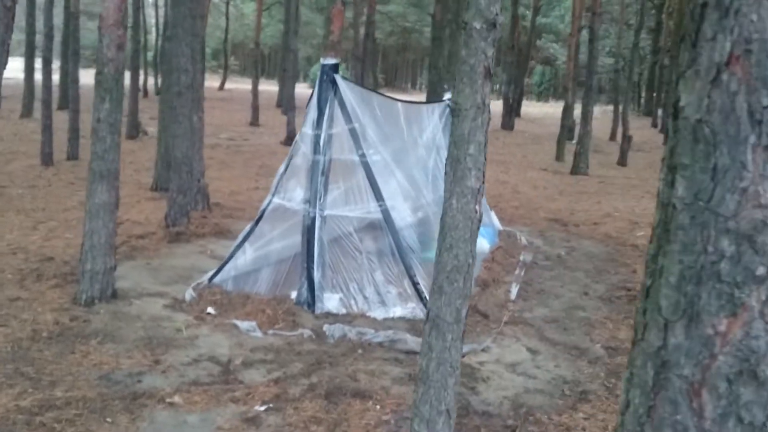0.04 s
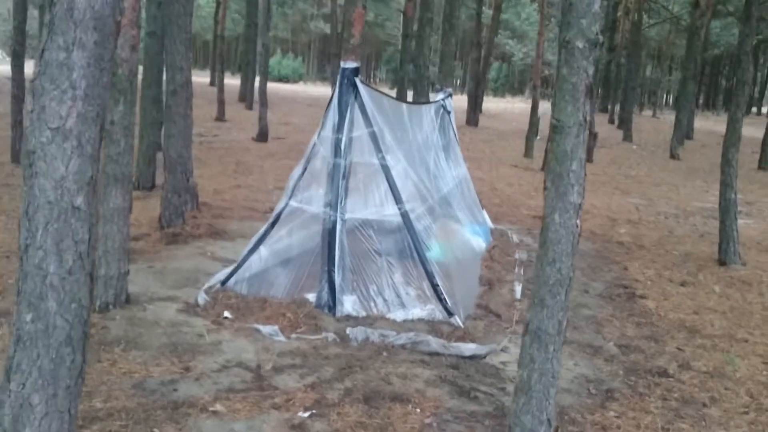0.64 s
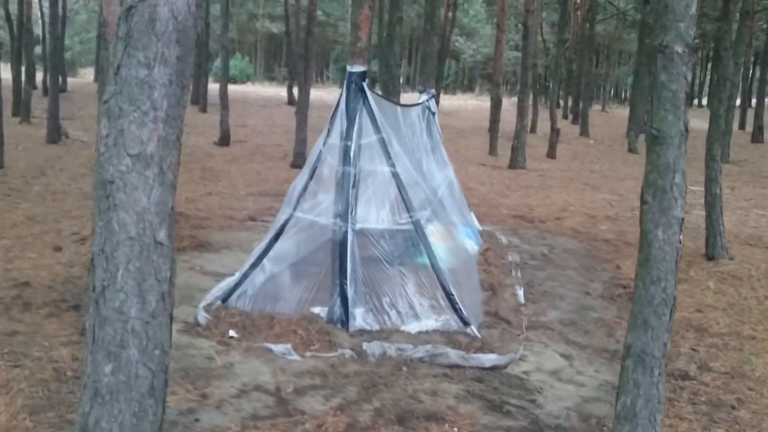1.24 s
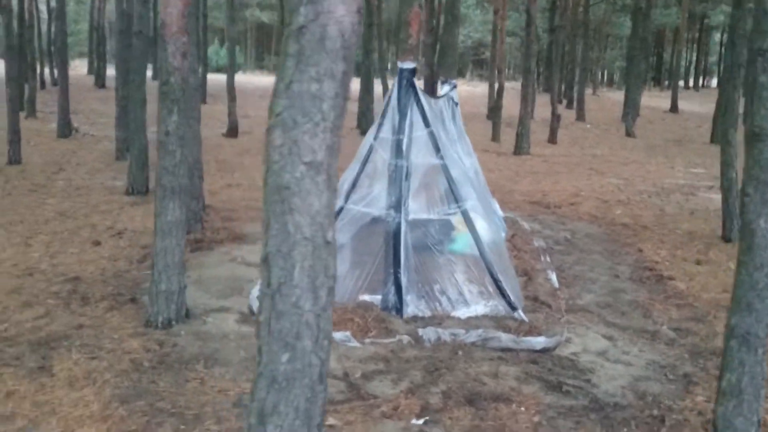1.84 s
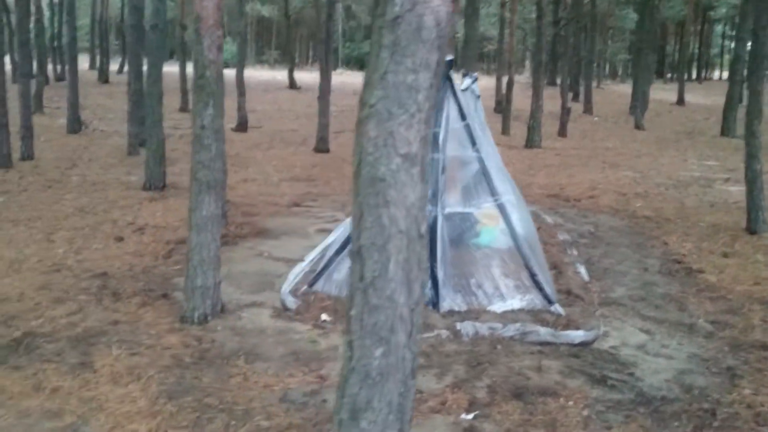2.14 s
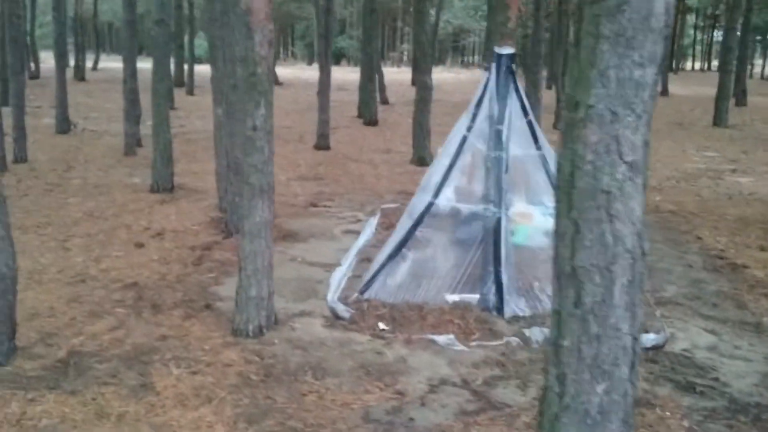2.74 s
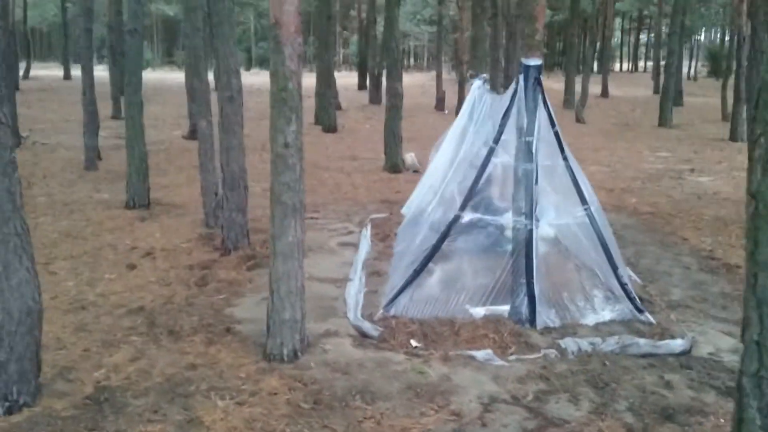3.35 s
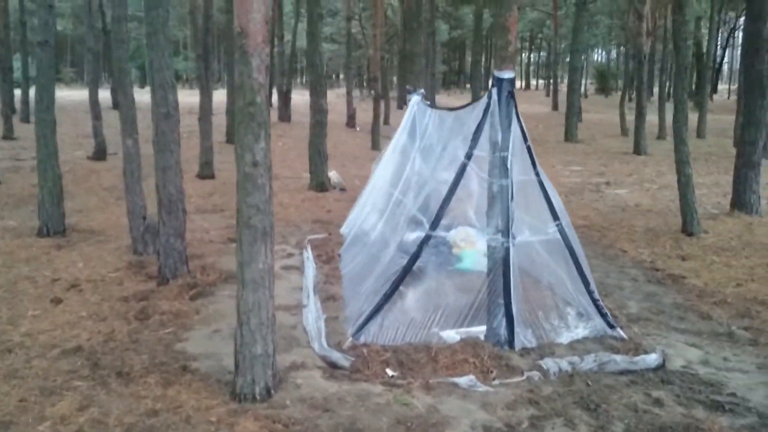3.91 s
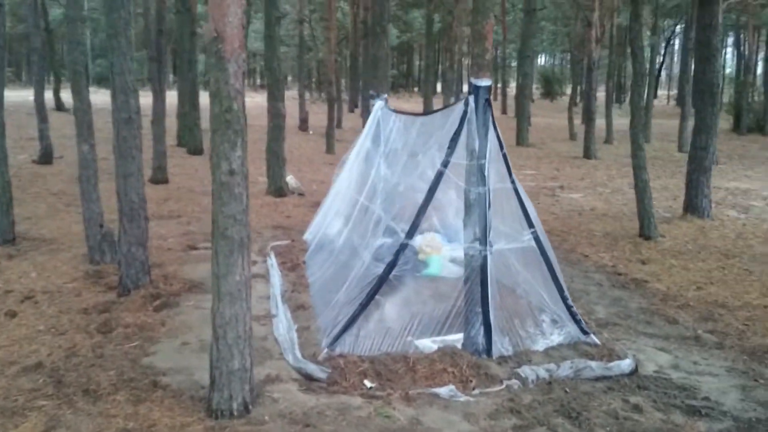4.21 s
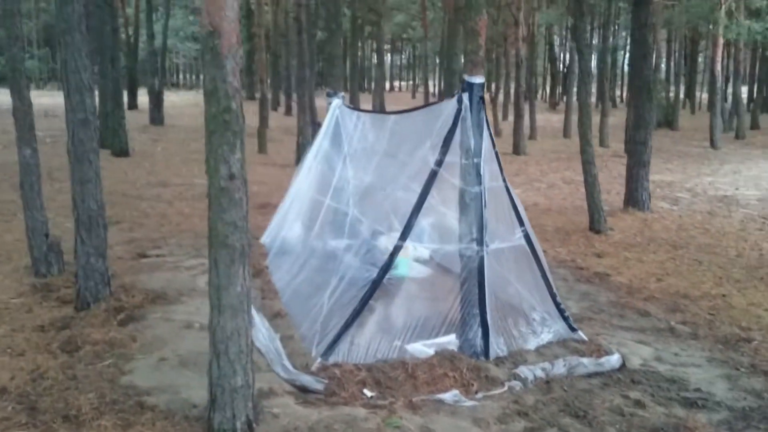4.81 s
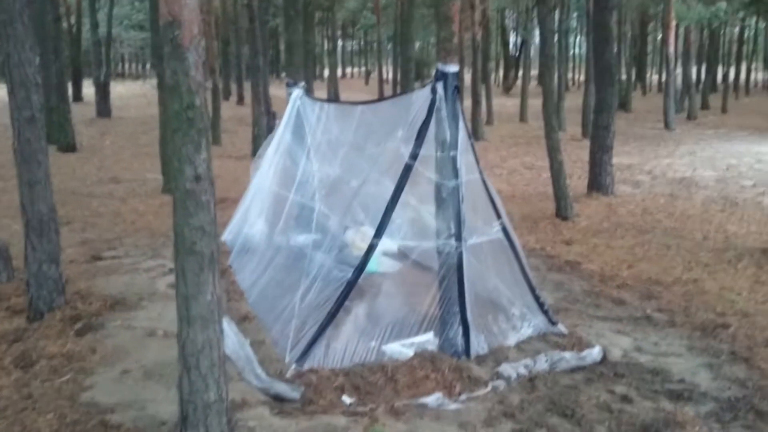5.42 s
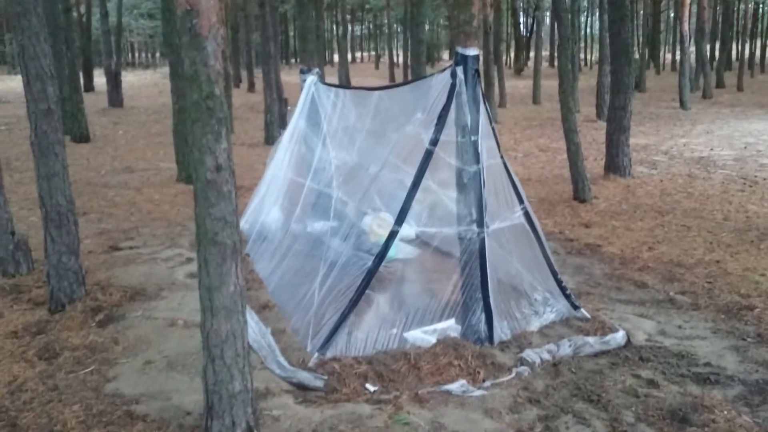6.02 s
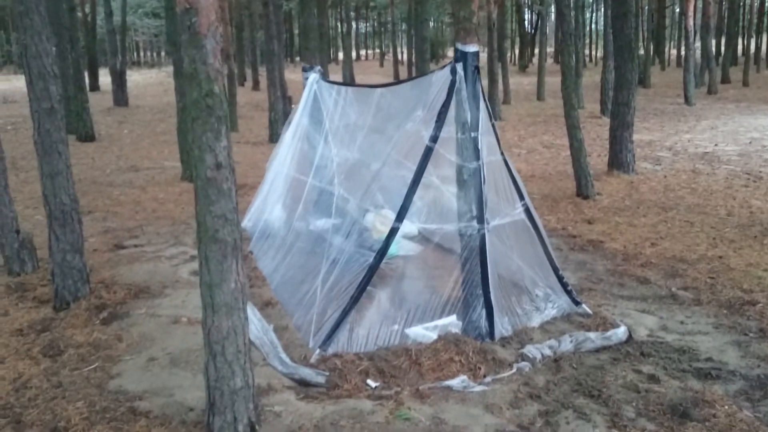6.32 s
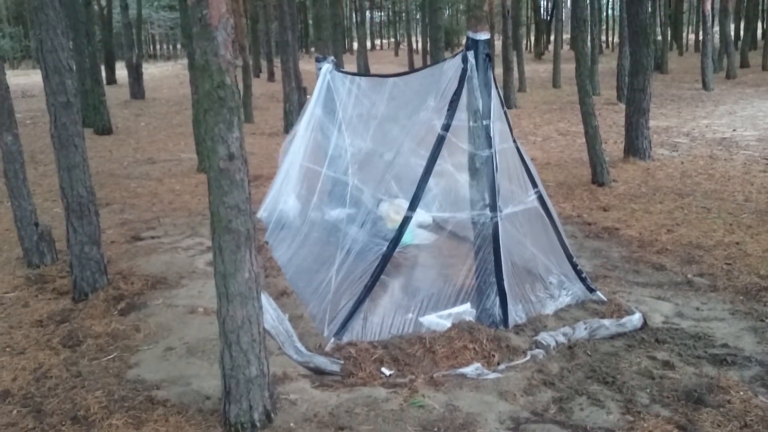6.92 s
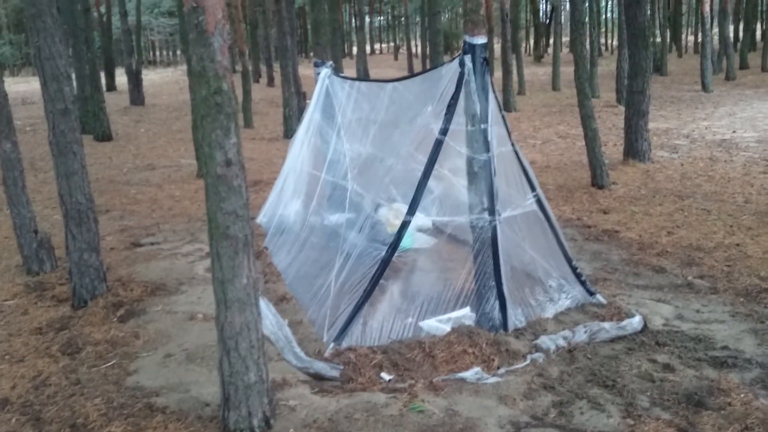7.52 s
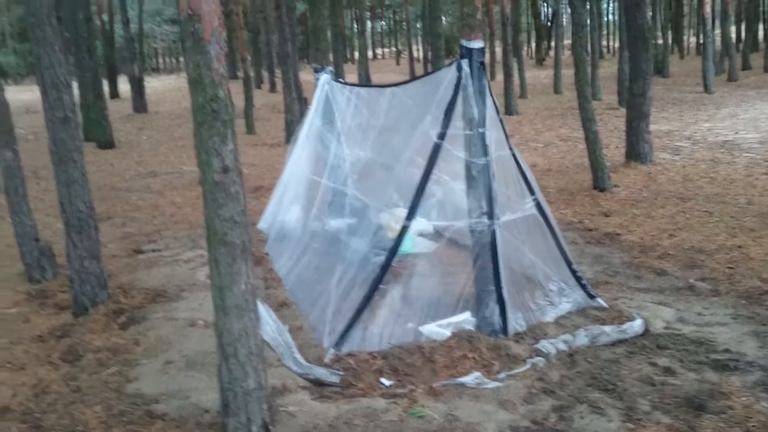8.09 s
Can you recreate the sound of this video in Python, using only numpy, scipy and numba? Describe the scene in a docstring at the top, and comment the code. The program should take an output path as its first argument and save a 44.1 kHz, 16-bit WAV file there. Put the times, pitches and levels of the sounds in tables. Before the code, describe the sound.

Wind buffets a handheld microphone in a pine wood, with deep rumble, flutter and sharp crackles that hit left and right separately and sometimes overload it. The treetops hiss faintly behind. From about three seconds, a plastic-sheet tent rustles softly on the left. After more hard blows, the wind eases to scattered puffs, leaving the hiss and light crinkling.

```python
"""A phone is carried round a plastic-sheet tent in a pine wood. From the start, gusts give each of its
two microphone ports its own turbulence: big eddies rumble, small ones flutter and crackle, and the peaks
overload the recorder. The pine crowns hiss behind; from about 3 s the sheeting's soft rustle grows.
Between 4.4 and 6.1 s the right channel's hiss and wind drop out briefly four times after hard blows.
Then the wind eases to scattered puffs over the hiss and the faint crinkling of the plastic."""
import sys
import numpy as np
from scipy import signal
from scipy.fft import rfft, irfft, next_fast_len
from scipy.io import wavfile
from scipy.ndimage import uniform_filter1d, minimum_filter1d
from numba import njit

SR = 44100
rng = np.random.default_rng(int(sys.argv[2]) if len(sys.argv) > 2 else 0)


def master(y):
    """Save y as 16-bit WAV."""
    cut = np.clip(np.atleast_2d(y).T, -1, 1)
    pcm = np.round(cut * 32767)  # scale
    wavfile.write(sys.argv[1], SR, pcm.astype(np.int16))


N = 359415
T = np.arange(N) / SR
FULL_FLOW_DB = -15.5  # a flow weaker than this comes in fits and starts

# a port's response to a pressure step, and the fizz of its own resonance: (frequency [Hz], gain [dB])
SNAP_SPECTRUM = [(100, -16.5), (400, 10), (1200, 12.5), (2500, 3), (4000, -9.5), (5500, -30), (7800, -23.5),
                 (10500, -42), (15000, -37)]
FIZZ_SPECTRUM = [(2000, -22.5), (5000, -0.5), (7800, 9), (10500, -10.5), (14500, -10.5), (16500, -17.5)]


def undb(db):
    """Amplitude ratio: a factor of ten for every 20 dB."""
    return 10 ** (np.asarray(db) / 20)


def curve(table):
    """Linear interpolation of (time [s], value) rows at every sample."""
    return np.interp(T, *np.transpose(table))


def unit(x):
    """Normalisation to rms 1."""
    return x / np.sqrt(np.mean(x ** 2))


def smooth(x, seconds):
    """Moving average, taken twice for a triangular window."""
    size = max(int(seconds * SR), 1)
    return uniform_filter1d(uniform_filter1d(x, size), size)


def steady(x, seconds):
    """Envelope normalisation: the rms stays near 1 over longer spans, while the quicker grain remains."""
    return x / np.sqrt(np.maximum(smooth(x * x, seconds), 1e-12))


def walk(hz):
    """Random modulation: low-passed noise of rms 1 that changes about hz times a second."""
    return unit(smooth(rng.standard_normal(N), 1 / hz))


def colour(x, spectrum):
    """Minimum-phase filter: folding the cepstrum makes a (frequency [Hz], gain [dB]) response causal."""
    size = 2 * next_fast_len(N // 2 + 4096)
    hz, db = np.transpose(spectrum)
    bin_hz = np.arange(size // 2 + 1) * SR / size
    log_gain = np.interp(np.log(bin_hz + 1), np.log(hz), db) * np.log(10) / 20
    cepstrum = irfft(log_gain)[:size // 2]
    cepstrum[1:] *= 2
    return irfft(rfft(x, size) * np.exp(rfft(cepstrum, size)))[:N]


def noise(spectrum):
    """Spectral shaping of white noise, at rms 1."""
    return unit(colour(rng.standard_normal(N), spectrum))


def swells(rows):
    """Incoherent bursts (time [s], level [dB], length [s]) add in power; each rises fast, fades softly."""
    power = np.zeros(N)
    for s, db, length in rows:
        near = slice(max(int((s - length) * SR), 0), int((s + 2 * length) * SR))
        age = (T[near] - s) / length
        power[near] += undb(db) ** 2 * np.exp(-np.where(age < 0, (2 * age) ** 8, 2 * age ** 2))
    return power


@njit
def lowpass(x, hz, damping):
    """Damped second-order system: a state-variable low-pass with a moving corner."""
    y, band_state, low_state = np.empty(len(x)), 0., 0.
    for i in range(len(x)):
        g = np.tan(np.pi * hz[i] / SR)
        band = (band_state + g * (x[i] - low_state)) / (1 + g * (g + damping))
        y[i] = low_state + g * band
        band_state, low_state = 2 * band - band_state, 2 * y[i] - low_state
    return y


def pines():
    """Aerodynamic noise: wind in the far crowns gives a smooth hiss, much stronger on the right."""
    # hiss of the crowns: (time [s], relative level [dB])
    hiss_levels = [(0.0, -45.5), (1.66, -46.5), (2.4, -42.5), (3.64, -44), (4.86, -44.5), (5.98, -44),
                   (6.55, -43), (8.14, -41.5)]
    # its spectrum at each microphone: (frequency [Hz], gain [dB])
    left_spectrum = [(100, -13), (400, -2), (900, 2.5), (2000, -2.5), (3800, -8.5), (5000, -16),
                     (8000, -34.5), (11000, -68.5), (15500, -40)]
    right_spectrum = [(100, -5), (400, -1.5), (600, 2), (900, 4.5), (1500, 5.5), (2200, 0.5), (3800, 1.5),
                      (5000, -11.5), (6500, -18), (9000, -25.5), (11000, -29), (15500, -28.5)]
    hiss = undb(curve(hiss_levels) + 0.48 * walk(9.6))
    return hiss * np.array([undb(-11) * noise(left_spectrum), undb(5) * noise(right_spectrum)])


def sheeting():
    """Superposed impulses: countless tiny creases tick as the plastic moves, heard mostly on the left."""
    # continuous fine rustle: (time [s], relative level [dB])
    rustle_levels = [(0.0, -67), (2.5, -68.5), (2.75, -81), (3.0, -67), (3.33, -61.5), (3.69, -64),
                     (3.92, -58), (4.91, -61), (5.08, -56), (5.74, -60.5), (7.01, -58.5), (8.14, -60.5)]
    # brief shifts of the sheet: (time [s], relative level [dB], length [s])
    crinkles = [(5.15, -63.5, 0.035), (6.35, -67, 0.022), (6.52, -67, 0.018), (6.68, -68, 0.021),
                (6.92, -71, 0.12), (7.052, -57, 0.008), (7.356, -57.5, 0.015), (7.40, -63, 0.054)]
    # spectra of the two: (frequency [Hz], gain [dB])
    rustle_spectrum = [(4500, -23), (6000, -12), (7300, 4.5), (8200, 1.5), (9200, -1), (10500, -23.5),
                       (12500, -29.5), (15500, -27)]
    crinkle_spectrum = [(3000, -24), (6000, -5.5), (8000, 6), (9500, 0.5), (11000, -17), (15500, -26)]
    creases = rng.standard_normal((3, N)) * undb(3.6 * rng.standard_normal((3, N)))
    rustle = undb(curve(rustle_levels) + walk(29)) * unit(colour(creases[0], rustle_spectrum))
    shifts = np.sqrt(swells(crinkles)) * undb(2.6 * walk(250))
    left = undb(8) * rustle + undb(19.5) * shifts * unit(colour(creases[1], crinkle_spectrum))
    right = undb(8) * shifts * unit(colour(creases[2], crinkle_spectrum))
    return np.array([left, right])


def crackles(port, snap_db, fizz_db, step_db):
    """Flow separation: air tears off the port's edge with a pressure step, a rattle and a resonant fizz."""
    # single tears: (time [s], port [0 left, 1 right], relative snap level [dB], relative fizz level [dB])
    tears = [(0.012, 0, -11, 0), (0.056, 1, -10, -32), (0.068, 0, -17, -29), (0.128, 1, -13.5, -33),
             (0.157, 1, -11.5, -15), (0.166, 0, -10.5, -16), (0.184, 1, -11.5, -30), (0.21, 0, -24, -32),
             (0.262, 1, -23, -37), (0.279, 1, -13.5, -12), (0.285, 0, -8.5, -13), (0.374, 0, -15.5, -20),
             (0.392, 0, -15, -20), (0.714, 1, -14, -17), (0.895, 0, -21.5, -33), (1.756, 1, -19.5, -35),
             (1.818, 1, -11, -35), (1.861, 0, -16.5, -14), (1.904, 0, -24, -35), (1.994, 0, -18.5, -16),
             (2.034, 0, -16, -18), (2.043, 1, -16, -35), (2.077, 0, -23, -38), (2.109, 0, -13.5, -22),
             (2.138, 0, -11, -13), (2.172, 0, -11, -13), (2.347, 0, -16.5, -33), (2.396, 0, -19, -33),
             (2.506, 0, -13, -33), (2.539, 0, -12, -1), (2.549, 0, -14.5, -0.5), (2.559, 0, -12.5, -16),
             (2.603, 0, -18.5, -20), (2.713, 0, -22, -41), (2.864, 0, -19, -16), (2.909, 0, -8.5, -10),
             (2.932, 0, -14, -23), (2.941, 0, -12.5, -11), (2.95, 0, -20, -13), (3.02, 0, -16, -21),
             (3.07, 1, -3.5, -6), (3.083, 1, 0, -24), (3.098, 1, -2.5, 1), (3.124, 1, -7, -36),
             (3.289, 0, -15.5, -22), (3.299, 0, -17, -25), (3.361, 0, -11.5, -8), (3.366, 0, -14, -4),
             (3.399, 1, -16.5, -20), (3.411, 0, -20.5, -14), (4.137, 1, -14, -33), (4.196, 0, -13.5, -31),
             (5.593, 1, -13.5, -34), (5.611, 1, 3.5, -8), (5.654, 1, -4, -40), (5.708, 0, -14, -30),
             (5.869, 1, -11, -44), (6.049, 1, -10.5, -38)]
    rows = [row for row in tears if round(row[1]) == port]
    steps = np.zeros(N)
    for s, _, db, _ in rows:
        steps[int(s * SR)] = undb(db + step_db) * rng.choice([-1, 1])
    snap_envelope = np.sqrt(swells([(s, db, 0.0022) for s, _, db, _ in rows]))
    fizz_envelope = np.sqrt(swells([(s, db, 0.0018) for s, _, _, db in rows]))
    rattle = undb(snap_db) * snap_envelope * steady(noise(SNAP_SPECTRUM), 0.00037)
    fizz = undb(fizz_db) * fizz_envelope * noise(FIZZ_SPECTRUM)
    return colour(steps, SNAP_SPECTRUM) + rattle + fizz


def sputter(strength, size_db, fizz_db=-28):
    """Repeated flow separation: pressure steps fall at random, more often the harder it blows."""
    tears_per_s = 50 * np.minimum(10 * strength, 2) ** 2.8 * undb(6 * walk(35))
    tears = rng.random(N) < tears_per_s / SR
    sizes = rng.uniform(-0.84, 1, N) * undb(size_db)
    steps = tears * sizes * np.minimum(strength, 1 / 8)
    return colour(steps, SNAP_SPECTRUM) + undb(fizz_db) * colour(steps, FIZZ_SPECTRUM)


def airflow(port, flow, attack_s=0.0079, release_s=0.034):
    """Power addition: steady flow and gusts sum to the strengths of the big and the small eddies."""
    # gusts: (time [s], port [0 left, 1 right], length [s], relative rumble [dB], relative flutter [dB])
    gusts = [(0.026, 1, 0.16, -9.5, -14.5), (0.246, 1, 0.041, -19, -20.5), (0.346, 1, 0.098, -14.5, -21),
             (0.353, 0, 0.078, -33, -20), (0.924, 1, 0.074, -17, -24.5), (1.375, 1, 0.16, -14.5, -21.5),
             (1.754, 1, 0.016, -9, -25.5), (1.917, 1, 0.033, -14, -24.5), (1.745, 0, 0.42, -15, -19.5),
             (2.478, 0, 0.093, -8, -19), (2.905, 0, 0.06, -25, -17), (3.063, 1, 0.1, -11, -15),
             (3.099, 0, 0.049, -33, -20), (3.282, 1, 0.13, -10, -18), (3.293, 0, 0.096, -20, -17.5),
             (3.476, 1, 0.028, -7.5, -20), (3.592, 1, 0.035, -11.5, -19.5), (3.689, 1, 0.045, -7.5, -20.5),
             (3.923, 1, 0.046, -13, -19), (4.115, 1, 0.14, -13, -19.5), (4.157, 0, 0.042, -16, -21),
             (4.432, 1, 0.134, -15, -20), (4.554, 1, 0.044, -12.5, -27), (4.718, 1, 0.0075, -12, -34),
             (4.808, 0, 0.11, -16.5, -24.5), (4.864, 1, 0.071, -16, -26), (5.058, 1, 0.015, -10, -33),
             (5.104, 1, 0.04, -18, -34), (5.259, 1, 0.07, -15, -32), (5.367, 1, 0.033, -18.5, -30),
             (5.437, 0, 0.066, -12.5, -19), (5.515, 1, 0.072, -17.5, -29), (5.586, 1, 0.16, -6.5, -20.5),
             (5.61, 0, 0.16, -11.5, -20.5), (5.769, 1, 0.18, -14.5, -24), (5.923, 0, 0.078, -10, -19.5),
             (6.041, 1, 0.087, -10.5, -22.5), (6.146, 1, 0.05, -12.5, -24.5), (6.073, 0, 0.011, -11, -37),
             (6.26, 1, 0.032, -10.5, -31), (6.408, 0, 0.018, -13.5, -33), (6.502, 1, 0.011, -19, -27.5),
             (6.594, 1, 0.033, -8.5, -26.5), (6.626, 0, 0.068, -27, -39), (6.708, 0, 0.037, -16, -25),
             (6.792, 0, 0.071, -22.5, -29), (6.778, 1, 0.02, -18, -40), (7.022, 0, 0.018, -20.5, -47),
             (7.074, 1, 0.016, -18, -31), (7.14, 0, 0.0092, -25, -48), (7.299, 0, 0.018, -12, -29),
             (7.277, 1, 0.062, -23, -33), (7.36, 0, 0.065, -25, -32.5), (7.48, 1, 0.0066, -18.5, -46),
             (7.796, 1, 0.027, -21, -33), (7.882, 1, 0.076, -30.5, -61), (7.973, 0, 0.014, -29, -52),
             (8.118, 0, 0.018, -23, -50)]
    flow_db = curve(flow)
    big_power = undb(flow_db) ** 2
    small_power = undb(flow_db - 8) ** 2
    for s, side, length, rumble_db, flutter_db in gusts:
        if round(side) == port:
            gust = np.clip(np.minimum((T - s) / attack_s, 1 - (T - s - length) / release_s), 0, 1)
            big_power += (gust * undb(rumble_db)) ** 2
            small_power += (gust * undb(flutter_db)) ** 2
    return np.sqrt(big_power), np.sqrt(small_power)


def shedding(per_s, wander, gap_db):
    """Vortex shedding: eddies leave the phone's edge at an uneven pace; the gain dips between them."""
    turns = np.cumsum(per_s * np.exp(wander * walk(45.34))) / SR
    return unit(undb(-gap_db * np.sin(np.pi * turns) ** 4))


def eddies(corner_hz, patches, response):
    """Intermittency: pressure jumps of very unequal size; the smallest eddies, above the corner, die out."""
    jumps = rng.standard_normal(N) * undb(7.5 * rng.standard_normal(N)) * patches
    return colour(lowpass(jumps, np.clip(corner_hz, 150, 3000), damping=1.81), response)


def port_wind(port, flow, rumble_spectrum, response, rumble_db, flutter_db, flap_db,
              base_corner_hz, corner_rise, patchy_db, sputter_db):
    """Turbulent pressure at a port: big eddies rumble, small ones flutter, knots of fast air flap."""
    # hardest knots: (time [s], port [0 left, 1 right], relative level [dB], length [s], corner [Hz])
    buffets = [(0.075, 1, -15, 0.022, 1100), (0.387, 1, -17, 0.0053, 800), (0.536, 0, -8, 0.0055, 480),
               (0.581, 1, -13, 0.0076, 520), (0.712, 1, -6, 0.0039, 790), (0.933, 1, -19.5, 0.0068, 517),
               (0.985, 1, -22, 0.0022, 600), (1.156, 0, -15.5, 0.018, 596), (1.368, 0, -10.5, 0.013, 530),
               (1.396, 1, -14, 0.013, 526), (1.522, 1, -11, 0.0087, 500), (1.571, 1, -13, 0.0046, 450),
               (1.586, 1, -8, 0.0047, 494), (1.677, 1, -14, 0.013, 510), (1.814, 1, -2.5, 0.0017, 1060),
               (1.85, 0, -4, 0.0043, 600), (1.914, 0, -11.5, 0.009, 646), (1.927, 1, -14, 0.012, 550),
               (2.507, 0, -7.5, 0.0033, 790), (2.671, 0, -15.5, 0.0039, 650), (2.983, 1, -9, 0.0096, 476),
               (3.082, 1, -4, 0.018, 1800), (3.132, 1, -9.5, 0.025, 1300), (3.269, 0, -12, 0.0045, 604),
               (3.34, 0, -5, 0.0034, 650), (3.393, 1, -8, 0.01, 590), (3.516, 1, -8.5, 0.0054, 520),
               (3.869, 1, -18, 0.0048, 477), (3.999, 0, -17, 0.0078, 448), (4.052, 0, -15.5, 0.0082, 480),
               (4.182, 1, -20.5, 0.017, 900), (4.351, 0, -11.5, 0.0066, 423), (4.371, 1, -9.5, 0.0083, 342),
               (4.432, 1, -12.5, 0.0054, 450), (4.721, 1, -2, 0.0059, 366), (4.739, 1, -14, 0.0084, 160),
               (4.862, 0, -15, 0.0061, 500), (4.886, 1, -10, 0.007, 726), (5.073, 1, -10.5, 0.0054, 150),
               (5.141, 1, -20, 0.017, 230), (5.284, 1, -9, 0.012, 405), (5.609, 1, -8.5, 0.012, 2680),
               (5.692, 1, -6.5, 0.013, 435), (5.776, 1, -9, 0.0041, 500), (5.816, 0, -11.5, 0.0067, 450),
               (5.901, 1, -13.5, 0.017, 700), (6.063, 1, -2.5, 0.0027, 910), (6.111, 1, -10, 0.017, 480),
               (6.164, 1, -11.5, 0.0093, 300), (6.851, 0, -20.5, 0.0068, 470), (7.331, 1, -20, 0.016, 258)]
    big_gain, small_gain = airflow(port, flow)
    big_eddies = steady(noise(rumble_spectrum), 0.017)
    # eddies of all sizes stutter together, more deeply in a weak flow
    slack_db = np.maximum(FULL_FLOW_DB - 20 * np.log10(big_gain), 0)
    stutter_db = 1.85 * walk(19.2) + (1.5 + 0.32 * slack_db) * np.tanh(walk(48))
    rumble = big_eddies * big_gain * undb(rumble_db + stutter_db)
    # small eddies come in patches on the crests of the big ones
    patches = undb(patchy_db * np.minimum(walk(300) + 0.71 * big_eddies, 1.6))
    # faster air makes them louder, smaller and so brighter
    strength = small_gain * undb(np.minimum(stutter_db, 3))
    corner_hz = base_corner_hz * (10 * strength * patches) ** corner_rise
    flutter = strength * steady(eddies(corner_hz, patches, response), 0.0082)
    flutter *= shedding(per_s=32, wander=0.55, gap_db=10)
    # a knot gives a short flap, dull or bright by the size of its eddies
    s, _, db, length, knot_hz = np.transpose([row for row in buffets if round(row[1]) == port])
    knot_eddies = eddies(np.interp(T, s, knot_hz), np.sqrt(patches), response)
    flaps = np.sqrt(swells(zip(s, db, length))) * steady(knot_eddies, 0.0025)
    return rumble + undb(flutter_db) * flutter + undb(flap_db) * flaps + sputter(small_gain, sputter_db)


def wind_left():
    """Wind shadow: the left port faces the flow at first, then falls into the lee."""
    # steady flow past the port: (time [s], relative level [dB])
    flow = [(0.0, -14), (1.4, -14), (2.3, -15), (3.5, -11.5), (3.59, -22), (3.76, -12.5), (3.91, -21.5),
            (4.13, -23), (4.62, -28), (4.75, -45), (5.001, -31), (5.24, -45), (5.4, -16), (5.56, -26.5),
            (6.05, -19), (6.42, -28), (6.58, -46), (7.3, -37), (7.65, -50), (8.15, -48)]
    # spectrum of the big eddies, and the port's response to small ones: (frequency [Hz], gain [dB])
    rumble_spectrum = [(25, -12), (46, -10.5), (58, 2.5), (100, -1), (150, -8.5), (230, -17.5),
                       (400, -31.5), (900, -89.5)]
    response = [(60, -18), (150, 2), (250, -1), (1000, -5), (2500, -11), (4000, -22.5), (5200, -13),
                (7800, -7.5), (10500, -16), (15000, -4)]
    air = port_wind(0, flow, rumble_spectrum, response, rumble_db=2, flutter_db=3.5, flap_db=3,
                    base_corner_hz=296, corner_rise=0.74, patchy_db=5.5, sputter_db=16)
    return air + crackles(0, snap_db=-3, fizz_db=-21, step_db=18.5)


def wind_right():
    """Buffeting: turbulence strikes the right port in separate, harder blows."""
    # steady flow past the port: (time [s], relative level [dB])
    flow = [(0.0, -12.5), (0.8, -21.5), (1.25, -18), (1.9, -17.5), (2.15, -20.5), (2.85, -24), (3.1, -18.5),
            (3.56, -21.5), (3.85, -17), (4.08, -26), (4.449, -14.5), (4.68, -27), (5.22, -35), (5.8, -18.5),
            (6.25, -26), (6.9, -36), (7.7, -43), (8.15, -46)]
    # spectrum of the big eddies, and the port's response to small ones: (frequency [Hz], gain [dB])
    rumble_spectrum = [(25, -26.5), (46, -11.5), (58, -3), (100, -4), (150, -10), (230, -20), (400, -28.5),
                       (900, -91.5)]
    response = [(60, -24), (150, -2.5), (250, -1.5), (1000, -6.5), (2500, -13), (4000, -21.5), (5500, -21),
                (7800, -13), (10500, -22.5), (15000, -5.5)]
    air = port_wind(1, flow, rumble_spectrum, response, rumble_db=1.5, flutter_db=7, flap_db=2.5,
                    base_corner_hz=360, corner_rise=0.88, patchy_db=4, sputter_db=17)
    return air + crackles(1, snap_db=1, fizz_db=-19.5, step_db=12.5)


def scene():
    """Superposition of wood, tent and wind; the right channel is ducked briefly at four set times."""
    # the right channel's hiss and wind drop out after hard blows: (time [s], length [s])
    dips = [(4.45, 0.0071), (5.302, 0.0079), (5.648, 0.0091), (6.09, 0.013)]
    ducked = np.minimum(swells([(s, 0, length) for s, length in dips]), 1)
    background_left, background_right = pines() + sheeting()
    left = background_left + wind_left()
    right = background_right * undb(-16 * ducked) + wind_right() * undb(-10 * ducked)
    return np.array([left, right])


def limiter(x, threshold, release_s):
    """Peak limiting: the gain falls just ahead of a peak and recovers; soft clipping rounds the rest."""
    # the held peak is the largest of all earlier peaks, each fading at the release rate
    fade = T / release_s
    peak = np.exp(np.maximum.accumulate(np.log(np.abs(x) + 1e-9) + fade) - fade)
    gain = threshold / np.maximum(peak, threshold)
    x = x * smooth(minimum_filter1d(gain, size=128), 0.0019)
    return x / (1 + (x / 0.92) ** 8) ** (1 / 8)


def record(dry):
    """Band limiting and overload: each microphone has a low cut, its own limiter and a top cut."""
    low_cut = signal.butter(4, 36, "highpass", fs=SR, output="sos")
    top_cut = signal.ellip(8, 0.2, 70, 16200, fs=SR, output="sos")
    limited = np.array([limiter(x, threshold=1.23, release_s=0.18) for x in signal.sosfilt(low_cut, dry)])
    return signal.sosfilt(top_cut, limited)


dry = scene()
out = record(dry)
master(out)
```